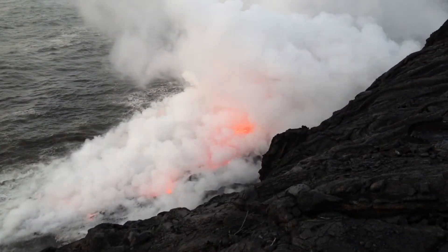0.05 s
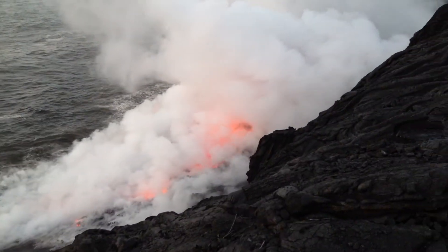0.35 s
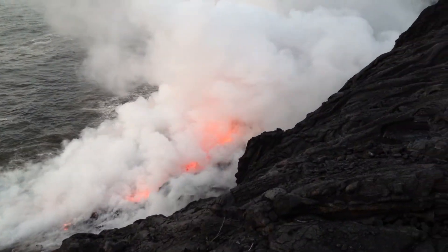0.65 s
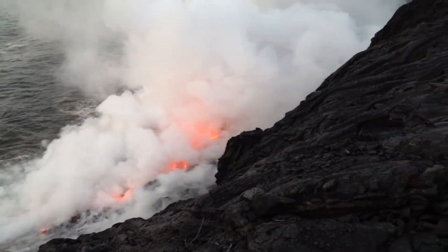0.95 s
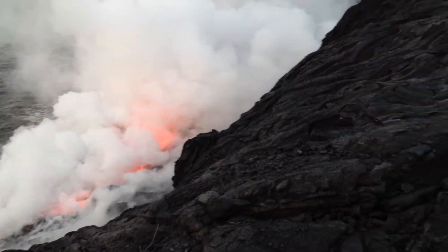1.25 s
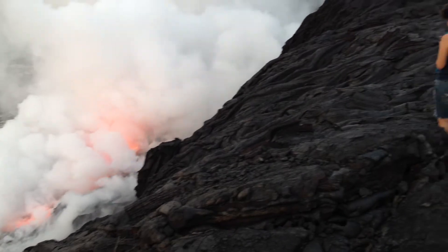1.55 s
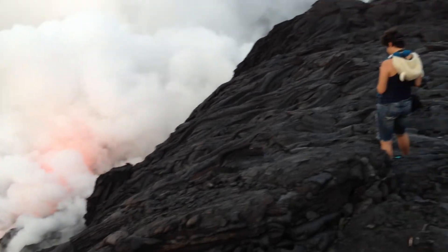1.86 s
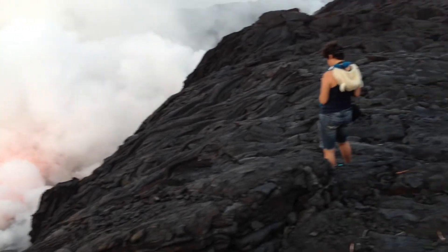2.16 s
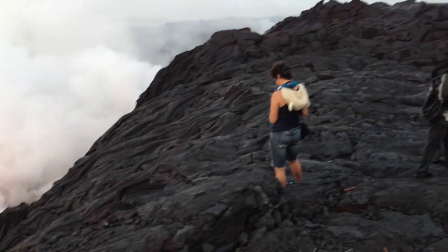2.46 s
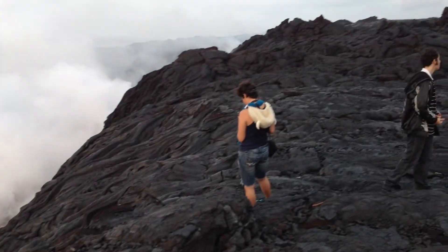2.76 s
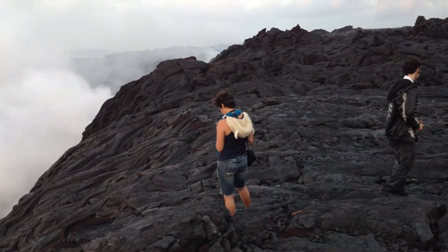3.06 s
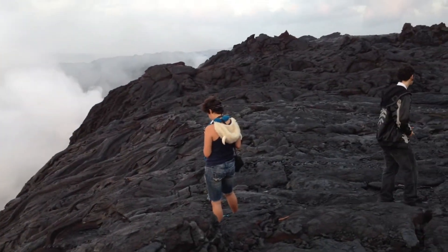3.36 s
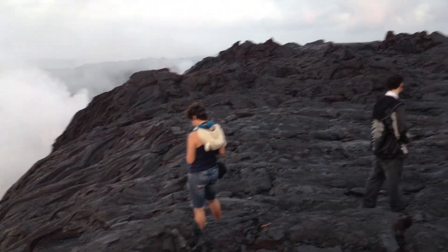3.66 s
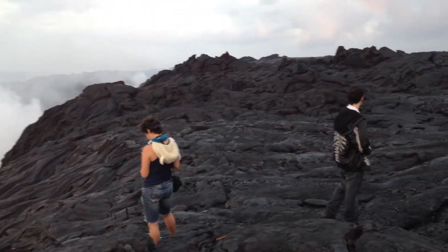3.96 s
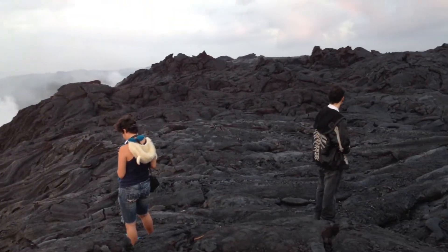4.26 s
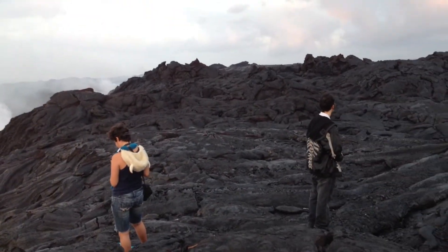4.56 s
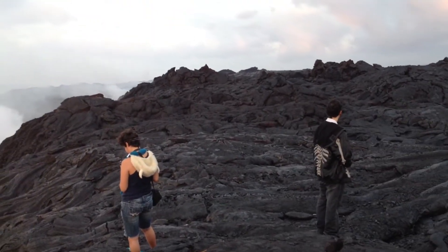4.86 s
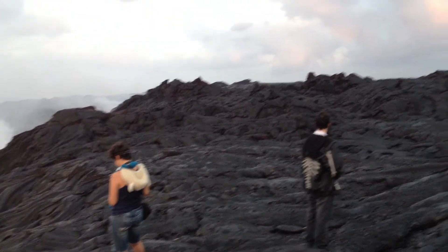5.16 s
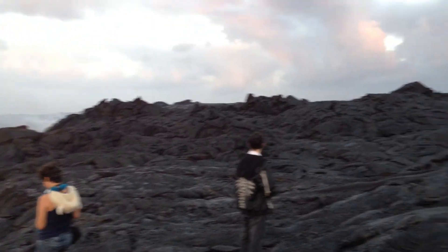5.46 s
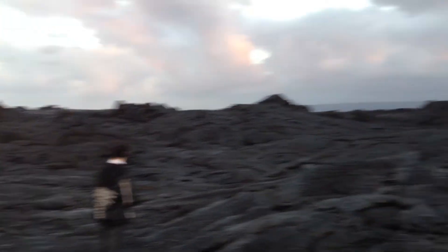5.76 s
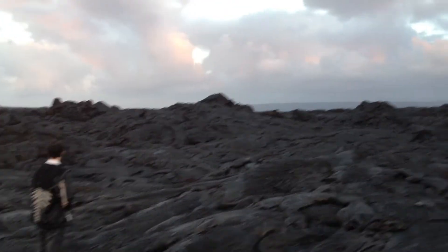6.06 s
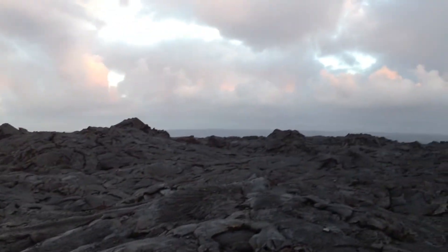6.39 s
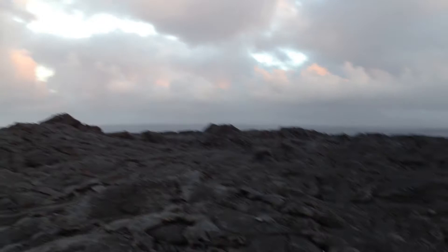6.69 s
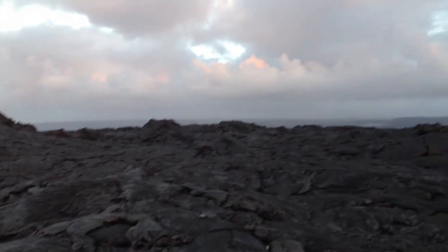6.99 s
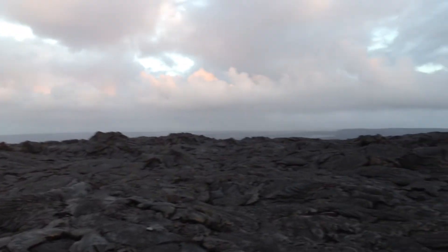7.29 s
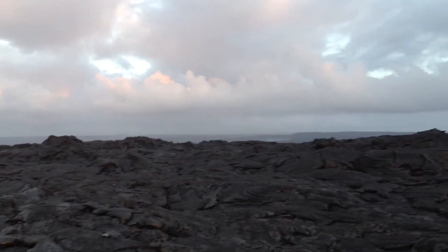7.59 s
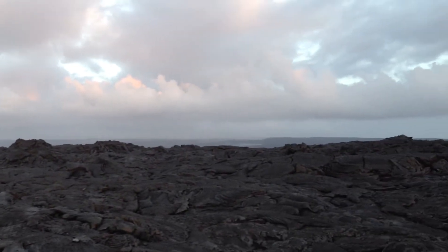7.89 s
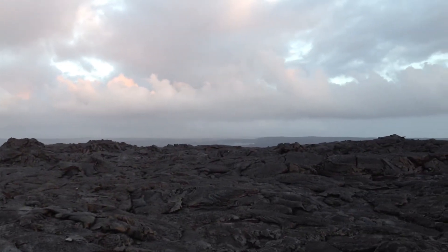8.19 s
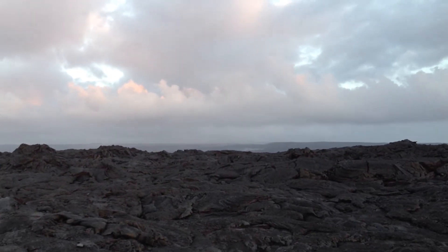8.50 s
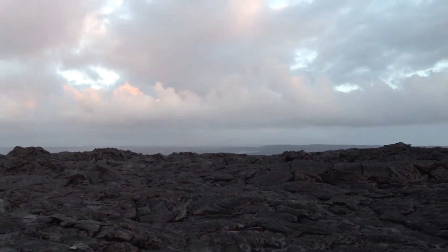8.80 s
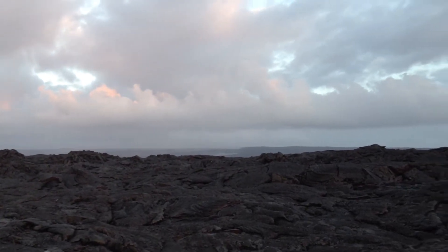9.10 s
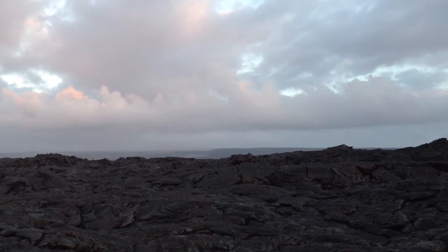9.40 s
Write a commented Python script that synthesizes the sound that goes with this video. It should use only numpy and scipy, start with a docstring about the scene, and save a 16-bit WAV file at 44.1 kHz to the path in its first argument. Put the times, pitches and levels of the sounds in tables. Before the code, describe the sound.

Surf and hissing steam roar steadily, then fade as gusts of wind rumble harder and harder on the microphone.

```python
"""A steady roar and hiss: surf breaks on a lava flow below a cliff and boils off as steam.
Countless far bubbles and steam jets merge into one wash, which dims and changes colour
as a hand-held camera turns from the sea to the land. Gusts and eddies buffet its single
microphone harder and harder with rumble and flutter. Late on, two faint ticks sound close by."""
import sys
import numpy as np
from scipy import signal
from scipy.fft import rfft, irfft
from scipy.io import wavfile
from scipy.ndimage import uniform_filter1d

SR = 44100
rng = np.random.default_rng(int(sys.argv[2]) if len(sys.argv) > 2 else 0)


def wrap_up_sound(samples):
    """Save the sound to the file named by the first command line argument, as 16-bit audio."""
    columns = np.atleast_2d(samples).T
    # keep every value between -1 and 1, then stretch to whole-number steps
    tamed = np.clip(columns, -1, 1)
    steps = np.round(tamed * 32767).astype(np.int16)
    wavfile.write(sys.argv[1], SR, steps)


N = 416304
TIME = np.arange(N) / SR

# fader rides of the shore: t/s, surf roar level/dB, steam hiss level/dB
SHORE_LEVELS = [(0, -40.5, -40.3), (0.25, -41, -42.0), (0.65, -40, -37), (1.05, -40, -38.5),
                (1.35, -38, -38.5), (2.55, -37, -37.5), (3.5, -39.5, -39), (4.4, -46, -48),
                (4.85, -49.5, -48.5), (5.4, -44.5, -45), (5.85, -49.0, -50.0), (6.5, -48, -50),
                (7.25, -52.5, -55.5), (8.3, -51.8, -54.0), (9.44, -50, -49.9)]
# brief surges of steam: t/s, hiss gain/dB, half length/s
STEAM_SURGES = [(.7, -0.4, 0.11), (1.7, 1.5, 0.055), (3.48, 2, 0.064), (5.23, 2, 0.046), (5.54, 4.5, .09)]
# base tone of surf and steam together: f/Hz, relative level/dB
WASH_SPECTRUM = [(30, -22), (70, -23), (160, -3), (330, -2.5), (520, -7.5), (800, -7), (1150, -10.5),
                 (1600, -8.5), (2300, -11.5), (3000, -14), (6300, -15.5), (9300, -19.5), (13300, -15),
                 (15500, -21)]
# resonances of the microphone port: f/Hz, half width/Hz, gain/dB
PORT_EQ = [(4390, 420, 3.5), (4770, 240, 4.5), (5140, 290, -2.5)]
# peaks and shadows cast by the camera and its holder, per heading: f/Hz, half width/Hz, gain/dB
FACING_SEA_EQ = [(408, 125, -5), (1120, 140, -2.5), (2750, 210, -5), (7600, 1400, 2.5), (10900, 850, 4)]
SIDEWAYS_EQ = [(412, 125, 3), (3600, 760, -2.5), (4450, 450, 0.5), (6500, 430, 2), (7450, 550, -1.8),
               (9750, 900, 1.5)]
OVER_SHOULDER_EQ = [(950, 1000, -2), (3080, 330, -1.5), (4630, 870, 3), (6330, 320, -1), (9100, 280, -1),
                    (11200, 600, -4.5), (12700, 1300, 2.5)]
SEA_BEHIND_EQ = [(700, 170, 1.2), (1520, 300, -1.9), (3000, 450, 0.82), (8600, 400, -.8),
                 (11000, 400, -1.2)]
FULLY_AWAY_EQ = [(1050, 330, 2), (1790, 340, -4), (2920, 370, 0.3), (8400, 730, 4), (10600, 900, 0.5)]
# the turn through those five headings: t/s, heading (0 facing the sea to 4 fully away)
CAMERA_TURN = [(0, 0), (.9, .1), (2.1, .9), (3.9, 1.05), (4.75, 1.95), (5.5, 2.05), (5.9, 2.9), (6.7, 3.1),
               (7.5, 3.8), (8.6, 4)]

# small dry ticks: t/s, gain/dB
TICK_HITS = [(7.699, -22.5), (7.852, -34)]
# the ring of a tick: f/Hz, relative level/dB, t60/s
TICK_RING = [(726, -5, 0.0073), (1240, -4, 0.0043), (1780, -8, 0.012), (2400, -16, 0.0058),
             (4400, -15, .004)]

# the breeze under the gusts: t/s, level/dB
BREEZE_LEVELS = [(0, -52), (.6, -50.5), (1.4, -41), (2.7, -40), (4.4, -36), (5.1, -39), (7.5, -39),
                 (9.44, -43.5)]
# gusts that rise out of the breeze, hold and fall back: start t/s, hold/s, level/dB
WIND_GUSTS = [(.12, 0.056, -38), (1.057, .06, -32), (1.986, 0.61, -34.5), (3.292, 0.3, -32),
              (5.12, 0.055, -29), (5.52, 0.78, -29.5), (6.137, 0.66, -28), (6.898, .32, -31.5),
              (7.856, .3, -26), (8.29, 0.73, -30.5), (9.234, 0.28, -32.5)]
# the strongest eddies to hit the port: t/s, peak level/dB, sharpness (flutter against rumble)/dB
LARGE_EDDIES = [(.762, -27, -24), (.973, -25, -10), (2.039, -25.5, -20), (2.13, -22, -21),
                (2.339, -24.5, -24), (3.486, -22, -19), (5.429, -25, -5.5), (5.59, -19.5, -8),
                (5.722, -18.5, -17), (5.778, -26, -1), (6.236, -17.5, -7.5), (6.496, -21.5, -11),
                (6.66, -18.5, -12), (6.718, -15, -13), (7.183, -19.5, -6), (7.887, -21, -11.5),
                (7.947, -14.5, -15.5), (8.173, -17, -21), (8.46, -21.5, -16), (8.513, -18.5, -15),
                (8.653, -16, -3), (8.819, -20.5, -8.5), (8.922, -15.5, -12)]
# the wind's deep rumble and the higher flutter on top of it: f/Hz, relative level/dB
RUMBLE_SPECTRUM = [(22, -29), (40, -27), (60, -17), (100, -7), (150, 2.5), (240, -1), (310, -8.5),
                   (430, -18), (700, -42), (1300, -47), (4000, -90)]
FLUTTER_SPECTRUM = [(40, -50), (150, -18), (280, 7), (400, 1.5), (540, -3.5), (750, -15), (1100, -29),
                    (2000, -45), (5000, -80)]


def gain_of(db):
    """Decibels to amplitude."""
    return 10 ** (np.asarray(db) / 20)


def unit_rms(x):
    """Scales to an rms of 1."""
    return x / np.sqrt(np.mean(x ** 2) + 1e-20)


def curve_at(points, hz):
    """Breakpoints joined by straight lines over log frequency."""
    f, values = np.transpose(points)
    return np.interp(np.log(hz + 1), np.log(f + 1), values)


def follow(rows, t):
    """Each lane of a breakpoint envelope at the times t."""
    times, *lanes = np.transpose(rows)
    return [np.interp(t, times, lane) for lane in lanes]


def bells(rows, x):
    """Bell-shaped boosts and cuts in dB, along frequency or time."""
    return sum(db * np.exp(-((x - centre) / width) ** 2) for centre, width, db in rows)


def smooth(x, size, axis=0):
    """A triangular running mean."""
    return uniform_filter1d(uniform_filter1d(x, size, axis), size, axis)


def turning_eq(t, hz):
    """The peaks and shadows of camera and holder crossfade as the heading turns; in dB."""
    heading, = follow(CAMERA_TURN, t)
    eqs = [FACING_SEA_EQ, SIDEWAYS_EQ, OVER_SHOULDER_EQ, SEA_BEHIND_EQ, FULLY_AWAY_EQ]
    return sum(np.maximum(1 - abs(heading - k), 0)[:, None] * bells(eq, hz) for k, eq in enumerate(eqs))


def surf_and_steam(patchy_db=0.57, churn_db=0.35, roar_trim_db=-0.1, hiss_trim_db=0.08):
    """The bed: countless far bubbles and steam jets merge into a wash of shaped noise."""
    frame, hop = 1024, 256
    hz = np.fft.rfftfreq(frame, 1 / SR)
    t = np.arange(N // hop + 5) * hop / SR
    colour_db = curve_at(WASH_SPECTRUM, hz) + bells(PORT_EQ, hz) + turning_eq(t, hz)
    roar_db, hiss_db = follow(SHORE_LEVELS, t)
    hiss_db += hiss_trim_db + bells([(s, length, db) for s, db, length in STEAM_SURGES], t)
    sizzle_db = hiss_db - 4  # the fine spray follows the steam
    # ride each band to its level, blending between the band centres
    levels_db = [roar_db + roar_trim_db, hiss_db, sizzle_db]
    bands_hz = [(900, 2500), (3500, 8000), (9000, 15000)]
    centres_hz = np.sqrt(np.prod(bands_hz, axis=1))
    gain = np.zeros(colour_db.shape)
    for (lo, hi), share, level_db in zip(bands_hz, np.eye(3), levels_db):
        band_rms = np.sqrt(np.mean(gain_of(colour_db) ** 2 * ((hz > lo) & (hz < hi)), axis=1))
        blend = curve_at(list(zip(centres_hz, share)), hz)
        gain += (gain_of(level_db) / band_rms)[:, None] * blend
    # single splashes and jets light up patches; the whole mass churns a little
    patches = unit_rms(smooth(smooth(rng.standard_normal(gain.shape), size=8), size=14, axis=1))
    churn = unit_rms(smooth(rng.standard_normal(len(t)), size=9))[:, None]
    gain *= gain_of(colour_db + patchy_db * patches + churn_db * churn)
    noise = rng.standard_normal(N + 2 * frame)
    spectra = signal.stft(noise, nperseg=frame, noverlap=frame - hop)[2][:, :len(t)]
    return signal.istft(spectra * gain.T, nperseg=frame, noverlap=frame - hop)[1][:N]


def ticks():
    """Close detail: light knocks on something small and well damped."""
    t, out = np.arange(SR // 20) / SR, np.zeros(N)
    ring = sum(gain_of(db - 60 * t / t60) * np.sin(2 * np.pi * hz * t) for hz, db, t60 in TICK_RING)
    for s, db in TICK_HITS:
        out[round(s * SR):][:len(t)] += gain_of(db) * ring
    return out


def turbulence(spectrum):
    """The wind's raw texture: coloured noise, levelled from one moment to the next."""
    colour = gain_of(curve_at(spectrum, np.fft.rfftfreq(N, 1 / SR)))
    noise = irfft(rfft(rng.standard_normal(N)) * colour, N)
    return noise / np.sqrt(smooth(noise ** 2, size=700) + 1e-20)


def small_eddies():
    """A random wobble within +-1: small eddies come and go some twenty times a second."""
    noise = rng.standard_normal(N)
    return np.tanh(unit_rms(smooth(noise, size=800) - smooth(noise, size=3500)))


def airflow(attack_s=0.094, release_s=0.13):
    """The wind's envelope: the breeze, or whichever gust is stronger."""
    flow = gain_of(follow(BREEZE_LEVELS, TIME)[0])
    for start, hold, db in WIND_GUSTS:
        corners = [start - attack_s, start, start + hold, start + hold + release_s]
        flow = np.maximum(flow, gain_of(db) * np.interp(TIME, corners, [0, 1, 1, 0]))
    return flow


def wind_buffets(flow_trim_db=-0.3, lumpy_db=5.8, eddy_trim_db=-0.2, eddy_sigma_s=0.0098,
                 hard_blow_db=-27, flutter_db=-13.0, ragged_db=3, flutter_growth=0.89):
    """Up front: a lumpy stream of air rumbles and flutters on the port, and single eddies thump it."""
    # the air is briefly calmer behind each large eddy
    wake_lag_s, wake_half_s, wake_db = 0.07, 0.023, -3.5
    wakes_db = bells([(s + wake_lag_s, wake_half_s, wake_db) for s, _, _ in LARGE_EDDIES], TIME)
    rumble_env = airflow() * gain_of(flow_trim_db + lumpy_db * small_eddies() + wakes_db)
    # the flutter rides on the rumble, with a raggedness of its own
    drive = (rumble_env / gain_of(hard_blow_db)) ** flutter_growth
    flutter_env = drive * gain_of(hard_blow_db + flutter_db + ragged_db * small_eddies())
    # a large eddy takes over the port for as long as it passes
    for s, db, sharpness_db in LARGE_EDDIES:
        near = abs(TIME - s) < 6 * eddy_sigma_s
        thump = gain_of(db + eddy_trim_db) * np.exp(-.5 * ((TIME[near] - s) / eddy_sigma_s) ** 2)
        rumble_env[near] = np.maximum(rumble_env[near], thump)
        flutter_env[near] = np.maximum(flutter_env[near], thump * gain_of(sharpness_db))
    return rumble_env * turbulence(RUMBLE_SPECTRUM) + flutter_env * turbulence(FLUTTER_SPECTRUM)


def scene():
    """A mono mix: one microphone feeds both channels."""
    mono = surf_and_steam() + ticks() + wind_buffets()
    return np.array([mono, mono])


def record(dry):
    """The camera's wind filter thins the deep bass, and its band limit shaves off the very top."""
    low_cut_hz, high_cut_hz = 77, 15290
    wind_filter = signal.butter(2, low_cut_hz, "highpass", fs=SR, output="sos")
    band_limit = signal.firwin(1023, high_cut_hz, window=("kaiser", 9), fs=SR)
    return signal.oaconvolve(signal.sosfilt(wind_filter, dry), band_limit[None], "same")


dry = scene()
out = record(dry)
wrap_up_sound(out)
```